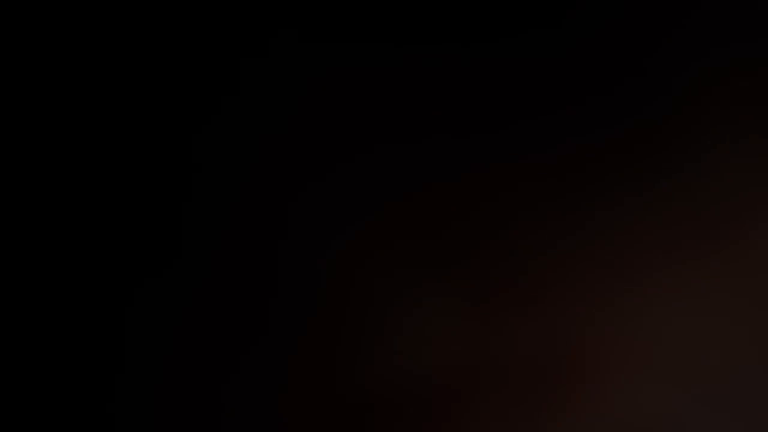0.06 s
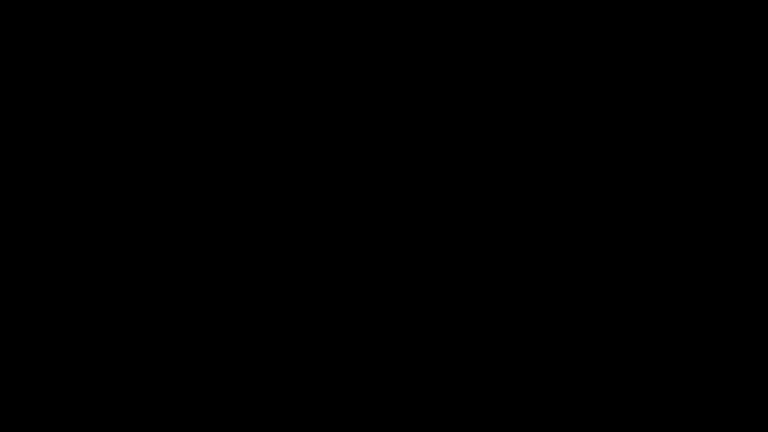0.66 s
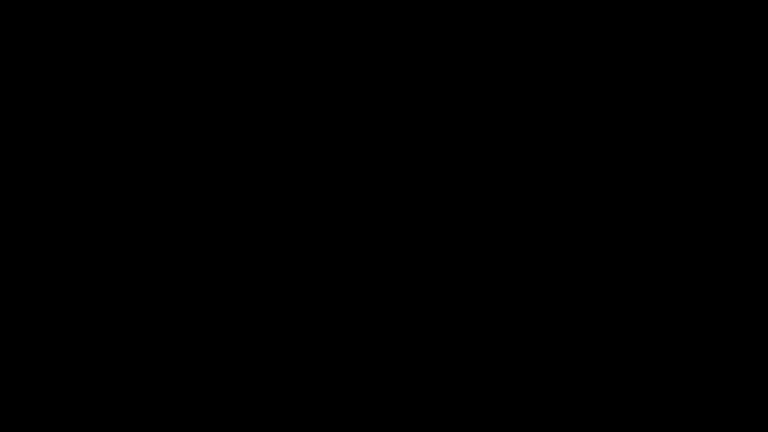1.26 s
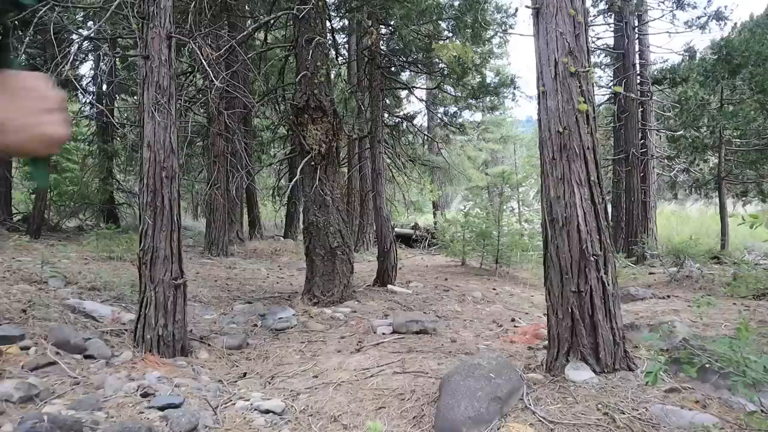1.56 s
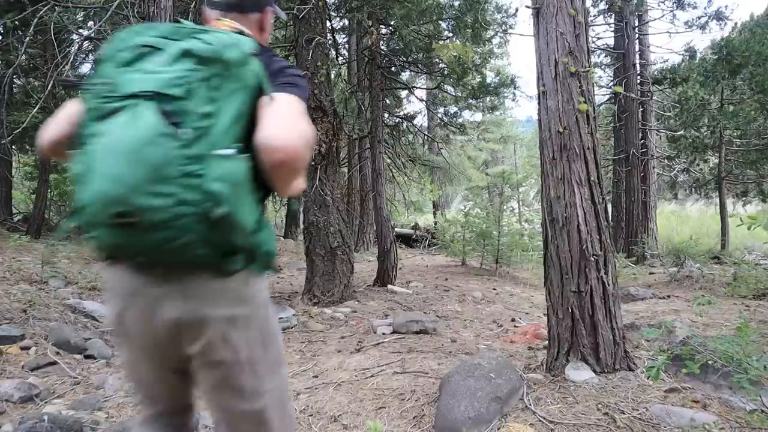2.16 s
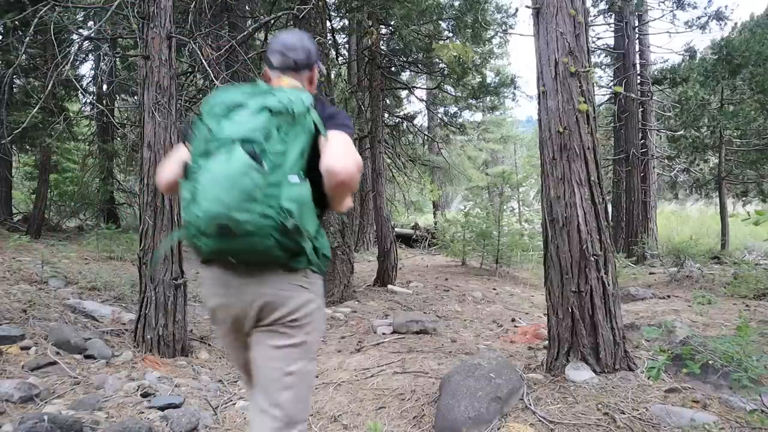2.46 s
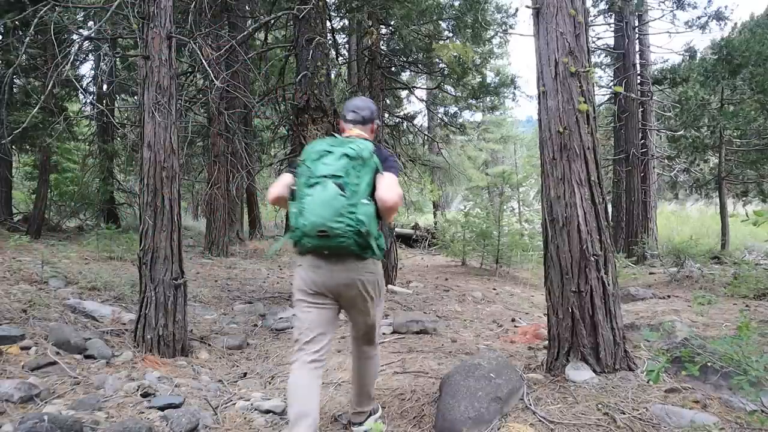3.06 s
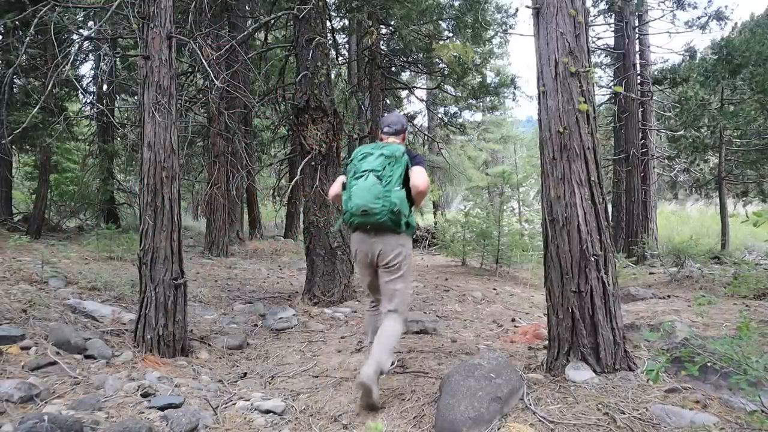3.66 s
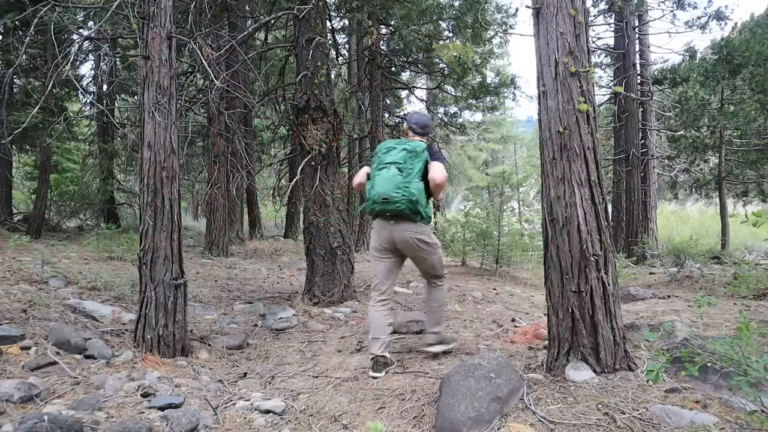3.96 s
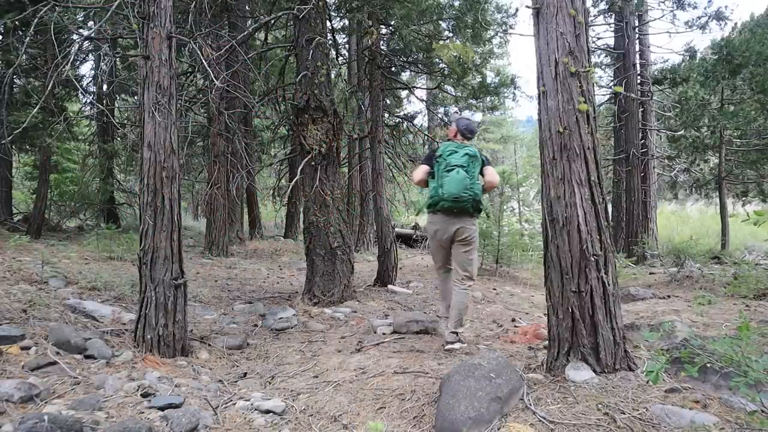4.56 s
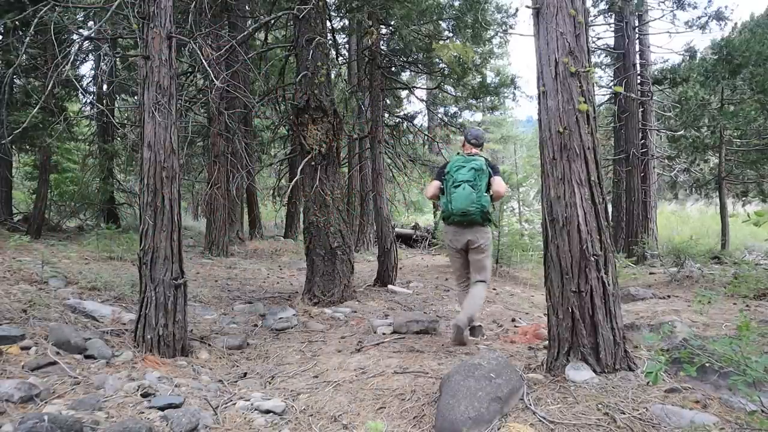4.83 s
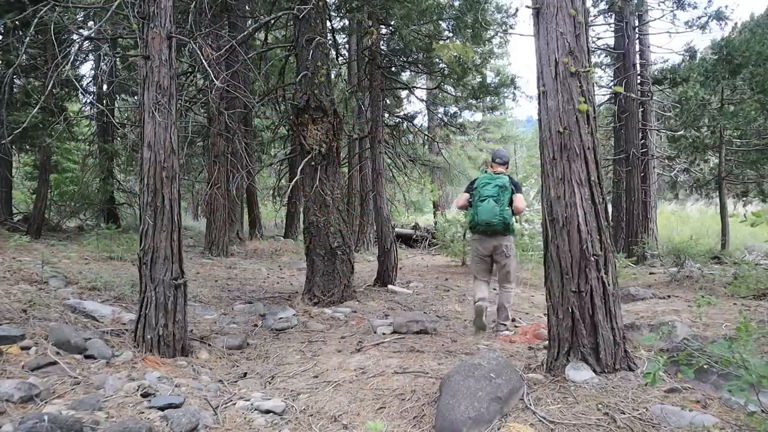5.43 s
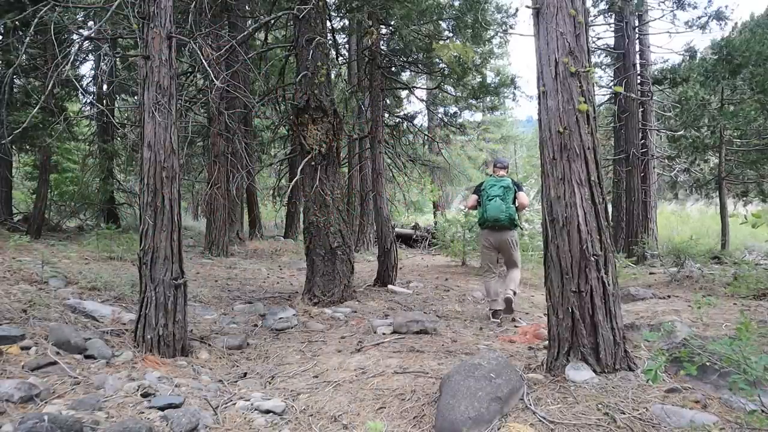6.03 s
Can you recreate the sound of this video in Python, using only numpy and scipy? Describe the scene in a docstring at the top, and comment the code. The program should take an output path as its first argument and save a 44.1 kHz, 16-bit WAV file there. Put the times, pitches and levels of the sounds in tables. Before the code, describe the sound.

A soft low bump and a steady forest rush are cut by half a second of silence. Then a hiker's footsteps pass close to the microphone, crunching dry pine needles, dirt and loose stones and snapping twigs, while a backpack rubs with a hollow tone. The steps recede into soft scuffs as a distant bird whistles a few short notes. Air rumbles lightly on the microphone.

```python
"""Footsteps of a hiker with a loaded pack pass close and recede over dry pine needles, dirt and stones.
Each step crushes soil, grit and needles in tiny fractures and snaps twigs; the pack rubs with a hollow
tone. A far bird whistles over the forest's rush of wind and water, and air rumbles on the microphone.
A soft bump opens the scene; the sound cuts out for half a second before the walk."""
import sys
import numpy as np
from scipy import signal
from scipy.fft import rfft, irfft, next_fast_len
from scipy.io import wavfile
from scipy.ndimage import uniform_filter1d, map_coordinates

SR = 44100
rng = np.random.default_rng(int(sys.argv[2]) if len(sys.argv) > 2 else 0)


def log_audio(samples):
    """Write samples as a 16-bit WAV file to the path given in sys.argv[1]."""
    # one column per channel
    frames = np.atleast_2d(samples).T
    # limit to full scale, then quantise
    limited = np.clip(frames, -1, 1)
    pcm = np.round(limited * 32767).astype(np.int16)
    wavfile.write(sys.argv[1], SR, pcm)


N = 277477
TIME = np.arange(N) / SR
MUTE_FROM_S, MUTE_TO_S = 1.016, 1.514

# Fracture spectra: f/Hz, gain/dB
SOIL_SPECTRUM = [(120, -58.5), (300, -3), (430, -1.5), (650, -1.5), (1150, -0.5), (1600, -9), (2600, -43.5),
                 (6000, -58)]
GRIT_SPECTRUM = [(700, -42), (1400, -14.5), (1900, -2), (3200, -1), (4600, -6), (6500, -11.5), (9000, -36),
                 (15000, -54)]
NEEDLE_SPECTRUM = [(3000, -7.5), (6000, -14.5), (8000, -5), (11000, -3.5), (16000, -10.5)]
# Loose stones in the ground: t/s, stoniness/0-1
STONINESS = [(1.9, 0.14), (2.04, 0.7), (2.56, 1), (2.6, 0.6), (2.66, 0), (2.95, 0.7), (3.12, 0.04),
             (3.6, 0)]


def steps(soil_db, grit_db, needle_db):
    """The sole crushes soil, grit and needles, which give way together in little clumps."""
    stony = np.clip(curves(STONINESS)[0], 0, 1)
    give = nearness() * wobble(170)
    soil = grains(SOIL_SPECTRUM, per_s=700, spread_db=2, clumps=amp(3.6 * give), dust_db=-8)
    grit = grains(GRIT_SPECTRUM, per_s=1300, spread_db=5.5, clumps=amp(2 * give), dust_db=-6)
    needles = grains(NEEDLE_SPECTRUM, per_s=2500, spread_db=2.5, clumps=amp(2.5 * give), dust_db=-11.5)
    stones = pebbles(hz=2970, scatter=.54, spread_db=15, swell_cycles=.23, count=2000)
    chips = pebbles(hz=7700, scatter=.2, spread_db=5, swell_cycles=1, count=2300)
    # stony ground: pitched clicks displace the dry crackle
    coarse = np.sqrt(1 - stony / 2) * grit + np.sqrt(stony / 2) * stones
    fine = np.sqrt(1 - stony) * needles + amp(1) * np.sqrt(stony) * chips
    # capped: single breaks stand out only under a light foot
    singles = amp(np.minimum(needle_db, -54) - 1) * nearness() * crackle(per_s=55, spread_db=5)
    return amp(soil_db - 3) * soil + amp(grit_db - 2.55) * coarse + amp(needle_db + 1.9) * fine + singles


# Shoe lands: t/s, hold/s, soil drive/dB, grit drive/dB, needle drive/dB, settling re crush/dB
FOOT_LANDINGS = [(1.51, .02, -47, -62, -73.5, -10), (2.049, 0.055, -28.5, -34, -52, -5.5),
                 (2.597, .07, -26, -30, -43.5, -16.5), (3.108, 0.086, -34, -37, -53, -11),
                 (3.594, 0.041, -41.5, -46.5, -61.5, -3), (3.708, 0.022, -43, -45.5, -61.5, -19.5),
                 (4.163, 0.059, -44, -47.5, -64.5, -6.5), (4.838, 0.059, -40, -48, -65, -2.5),
                 (5.4, 0.041, -38, -44.5, -55.5, -12.5), (5.826, .025, -47, -39.5, -52, -9.5),
                 (5.875, 0.034, -37, -42.5, -59, -22.5)]
# Sole rolls and pushes off: t/s, half length/s, soil drive/dB, needle drive/dB
SOLE_SCUFFS = [(1.913, 0.11, -52, -70), (2.163, 0.023, -37, -45.5), (2.274, 0.085, -42.5, -59),
               (2.463, 0.046, -42.5, -51.5), (2.524, 0.031, -33, -51), (3.06, 0.084, -42, -58),
               (4.278, 0.025, -51, -60.5), (4.457, 0.16, -54, -62.5), (4.948, 0.02, -53.5, -65.5),
               (5.513, 0.054, -49, -59.5)]


def tread():
    """Drive in dB on soil, grit and needles: footfalls crush and settle, scuffs swell and fade."""
    power = np.full((3, N), 1e-12)
    for s, hold_s, soil_db, grit_db, needle_db, settle_db in FOOT_LANDINGS:
        crush = swell(s, hold_s, rise_s=.028, fall_s=.026)
        settle = amp(settle_db) * swell(s, hold_s, rise_s=.028, fall_s=.45)
        power += np.outer(amp([soil_db, grit_db, needle_db]), np.maximum(crush, settle)) ** 2
    for s, half_s, soil_db, needle_db in SOLE_SCUFFS:
        grit_db = soil_db - 2.5
        power += np.outer(amp([soil_db, grit_db, needle_db]) ** 2, bell(s, half_s))
    return 10 * np.log10(power)


def nearness():
    """Falls from 1 to a half as the hiker walks off: far steps blur into a smoother scuff."""
    return np.interp(TIME, [3.1, 4.2], [1, .5])


def fractures(per_s, spread_db, max_sigma):
    """Brittle breaks: random impulses of uneven size and either sign."""
    breaks = rng.random(N) < per_s / SR
    sizes = amp(spread_db * np.clip(rng.standard_normal(N), -max_sigma, max_sigma))
    return breaks * sizes * rng.choice([-1, 1], N)


def grains(spectrum, per_s, spread_db, clumps, dust_db):
    """Tiny fractures on a bed of fine dust; rms 1."""
    breaks = unit(fractures(per_s, spread_db, max_sigma=2))
    dust = amp(dust_db) * rng.standard_normal(N)
    return steady(coloured((breaks + dust) * clumps, spectrum), samples=1500)


def pebbles(hz, scatter, spread_db, swell_cycles, count):
    """Small stones click together, each at its own pitch; rms 1."""
    when, phase = rng.random((count, 2)).T[..., None]
    pitch, size = np.clip(rng.standard_normal((count, 2)), -2, 2).T[..., None]
    k = np.arange(SR // 200)
    clicks = amp(spread_db * size) * ping(k / SR, hz * np.exp(scatter * pitch), swell_cycles, phase)
    at = (when * N).astype(int) + k
    return steady(np.bincount(at.ravel(), clicks.ravel(), N)[:N], samples=2000)


def crackle(per_s, spread_db):
    """Single dry needles break clear of the rest; rms 1."""
    return unit(coloured(fractures(per_s, spread_db, max_sigma=1.5), NEEDLE_SPECTRUM))


# Loudest twig and pebble cracks: t/s, level/dB, f/Hz, tick re level/dB
LOUD_SNAPS = [(1.5955, -37.5, 2010, -0.5), (1.8077, -22, 1500, -19), (1.8667, -28, 1930, -2.5),
              (1.9402, -29, 2040, -6.5), (2.0018, -23, 3330, 0), (2.0908, -14.5, 1500, -4),
              (2.0952, -9, 3100, -13.5), (2.1257, -15, 880, -13), (2.138, -19, 4520, -1),
              (2.242, -16, 1210, -32.5), (2.265, -16, 1420, -23), (2.2973, -14.5, 3820, -11),
              (2.301, -9.5, 2060, -17.5), (2.3792, -23, 1270, -17.5), (2.4338, -25.5, 3170, -8.5),
              (2.442, -19, 1400, -25), (2.557, -18.5, 2880, -1), (2.58, -15, 1870, -27),
              (2.6003, -7, 1100, -13), (2.9572, -21.5, 1490, -6.5), (3.0814, -24.5, 3800, -12.5),
              (3.1028, -21, 1550, -13), (3.121, -25.5, 5120, 11), (3.3655, -27, 2850, -17.5),
              (3.7966, -17, 2380, -8.5), (4.0805, -26.5, 2120, -2.5), (4.2002, -38.5, 3400, 9),
              (4.4576, -31, 4500, 5), (5.1878, -28, 3150, -11.5)]


def snaps(rows):
    """A twig breaks in damped swings with a tick, knocks the ground, scatters crumbs and splinters."""
    out, t = np.zeros(N + SR), np.arange(SR // 30) / SR
    for s, db, hz, tick_db in rows:
        phase, detune = rng.random(4), np.exp(.076 * rng.standard_normal(3))
        stony = np.interp(s, *np.transpose(STONINESS))
        tick_hz = np.interp(stony, [0, .8], [12500, 8200])  # thin needles tick highest
        swing = .8 * ping(t, hz, .45, phase[0]) + .12 * ping(t, 2.1 * hz * detune[0], .8, phase[1])
        splinters = amp(-11.5) * spray(t, tick_hz, ratio=1.47, t60_s=.014)
        tick = amp(tick_db) * (.6 * ping(t, tick_hz * detune[1], .9, phase[2]) + splinters)
        knock = amp(-12.5) * ping(t, 900 * detune[2], .58, phase[3])
        crumbs = amp(-8) * spray(t, hz, ratio=1.81, t60_s=.02)
        start = round(s * SR) - SR // 5000
        out[start:start + len(t)] += amp(db) * (swing + tick + knock + crumbs)
    return out[:N]


def small_twigs(grit_db, per_s=30, threshold_db=-56.5):
    """Random rows for snaps(): twigs break above a threshold, louder under a near, heavy foot."""
    when, size, pitch, tick = rng.random((int(per_s * N / SR), 4)).T
    at = (when * N).astype(int)
    load_db = np.minimum(grit_db[at] + 48.5, 10)
    level_db = -32 + .36 * load_db + 20 * np.log10(nearness()[at]) + 4 * (2 * size - 1)
    hz = 2610 * 2 ** (2 * pitch - 1)
    tick_db = -14 + 6 * (2 * tick - 1)
    rows = np.transpose([TIME[at], level_db, hz, tick_db])
    return rows[grit_db[at] > threshold_db]


# Pack shifts on the back: t/s, level/dB, hollow f/Hz
PACK_SHIFTS = [(1.53, -44.5, 235), (1.708, -36.5, 275), (1.858, -42.5, 250), (2.099, -38.5, 232),
               (2.23, -35.5, 255), (2.49, -33.5, 230), (2.56, -27.5, 240), (2.799, -53, 230),
               (3.058, -36.5, 220), (3.17, -30.5, 207), (3.448, -33, 226), (3.74, -49, 225),
               (4.14, -43.5, 240), (4.38, -49, 260), (4.68, -50.5, 250)]
# Rub spectrum: f/Hz, gain/dB
RUB_SPECTRUM = [(50, -22), (100, -16.5), (150, 0.5), (200, -5.5), (280, -4), (325, -5.5), (420, -6),
                (560, -19), (1500, -69)]


def pack():
    """The pack shifts with the stride: a broad rub with a hollow resonance that moves as it flexes."""
    power = sum((amp(db) * swell(s, hold_s=0, rise_s=.21, fall_s=.42)) ** 2 for s, db, _ in PACK_SHIFTS)
    phase = 2 * np.pi * np.cumsum(curves(PACK_SHIFTS)[1]) / SR
    hollow = unit(wobble(85) * np.cos(phase) + wobble(85) * np.sin(phase))
    rub = amp(.5) * rush(RUB_SPECTRUM, patchy_db=6)
    return np.sqrt(power) * steady(hollow + rub, samples=2400)


# Bird notes: t/s, length/s, turn position/0-1, start f/Hz, turn f/Hz, end f/Hz, level/dB
BIRD_NOTES = [(2.72, .1, .6, 2550, 2400, 2480, -48), (3.21, .11, .4, 2350, 2530, 2100, -53),
              (3.36, .13, .5, 2020, 2150, 2130, -51.5), (3.40, .05, .55, 3600, 4000, 3850, -52),
              (3.872, .075, .35, 2900, 3460, 2950, -42.5), (3.86, .11, .35, 2650, 3000, 2600, -50),
              (3.97, .075, .6, 2850, 3470, 3330, -50), (3.99, .065, .1, 2800, 2700, 2000, -50),
              (4.638, .033, .5, 3400, 3430, 3380, -50), (4.668, .042, .9, 2550, 3130, 3100, -49),
              (4.702, .125, .38, 3180, 2690, 2820, -43.5)]


def bird():
    """Slurred, fluttering whistles: each bends through one turn and swells towards it."""
    song = np.zeros(N)
    waver = 1 + .014 * wobble(260)
    for s, length_s, turn, start_hz, turn_hz, end_hz, db in BIRD_NOTES:
        on = (TIME > s) & (TIME < s + length_s)
        from_turn = np.interp((TIME[on] - s) / length_s, [0, turn, 1], [-1, 0, 1])
        hz = turn_hz + (np.where(from_turn < 0, start_hz, end_hz) - turn_hz) * from_turn ** 2
        envelope = amp(db) * (1 - from_turn ** 2) ** .51
        song[on] += envelope * np.sin(2 * np.pi * np.cumsum(hz * waver[on]) / SR)
    flutter = amp(1.3 * wobble(110))
    return song * flutter


def bump(at_s=.055, half_s=.016, hz=48):
    """A finger nudges the camera: one soft, low push."""
    return amp(-31) * bell(at_s, half_s) * np.sin(2 * np.pi * hz * (TIME - at_s))


# Spectra of the forest and of air on the microphone, before and during the walk: f/Hz, gain/dB
FOREST_REST_SPECTRUM = [(100, -9), (190, -5), (380, -8), (670, -2.5), (800, -3.5), (1240, 0), (1600, -5.5),
                        (3200, -11.5), (6300, -27), (9000, -31.5), (15800, -34.5)]
FOREST_WALK_SPECTRUM = [(30, -16), (60, -3), (130, 2), (380, 3), (650, -0.5), (1200, 1.7), (1600, -5),
                        (3200, -9.5), (4500, -19.5), (7000, -27.5), (15800, -30.5)]
AIR_REST_SPECTRUM = [(12, -12), (25, -2), (45, 0), (70, -3), (110, -7), (150, -18), (300, -45)]
AIR_WALK_SPECTRUM = [(10, -32), (22, -7.5), (40, -5), (80, -2), (120, 1.5), (200, -24.5), (500, -75)]
# Air in the hiker's wake: t/s, relative level/dB
WAKE_LEVELS = [(1.62, -57), (1.68, -50), (1.76, -49.5), (2.31, -46), (3.43, -50), (3.91, -56), (4.9, -53.5),
               (5.25, -60), (6.27, -64.5)]


def forest(fade_db_per_s=.55):
    """Distant wind and water rush; the passing hiker shields the microphone, and air rumbles on it."""
    rest_rush = amp(-43) * rush(FOREST_REST_SPECTRUM, patchy_db=1)
    rest_air = amp(-52) * rush(AIR_REST_SPECTRUM, patchy_db=-1.1)
    shield_db = 12.5 * bell(1.656, half_s=.23)
    walk_db = -42.5 - fade_db_per_s * (TIME - MUTE_TO_S) - shield_db
    walk_rush = amp(walk_db) * rush(FOREST_WALK_SPECTRUM, patchy_db=1.5)
    wake = amp(2.5 + curves(WAKE_LEVELS)[0]) * rush(AIR_WALK_SPECTRUM, patchy_db=1.5)
    return np.where(TIME < MUTE_FROM_S, rest_rush + rest_air, walk_rush + wake)


# Echo among the trunks: f/Hz, t60/s
ECHO_DECAY = [(200, .35), (2500, 0.98), (12000, 0.26)]


def woods(x):
    """Trunks scatter a diffuse echo that lasts longest in the midrange."""
    hz, t, noise = signal.stft(rng.standard_normal(SR // 2), SR, nperseg=256)
    decay = amp(-60 * t / along(ECHO_DECAY, hz)[:, None])
    tail = signal.istft(noise * decay, SR, nperseg=256)[1]
    return signal.fftconvolve(x, tail / np.linalg.norm(tail))[:N]


def ping(t, hz, swell_cycles, phase):
    """Heavily damped ring; its envelope peaks at 1 after swell_cycles."""
    u = t * hz / swell_cycles
    return u * np.exp(1 - u) * np.sin(2 * np.pi * (hz * t + phase))


def spray(t, hz, ratio, t60_s):
    """Dying noise burst from hz / ratio to hz * ratio."""
    band = signal.butter(2, np.clip([hz / ratio, hz * ratio], 100, 20000), "band", fs=SR)
    return signal.lfilter(*band, rng.standard_normal(len(t))) * amp(-60 * t / t60_s)


def rush(spectrum, patchy_db):
    """Noise with drifting patches of gain; rms 1."""
    bins = signal.stft(rng.standard_normal(N), nperseg=512)[2]
    patches = uniform_filter1d(rng.standard_normal(bins.shape), size=6, axis=0)
    patches = unit(uniform_filter1d(patches, size=14, axis=1))
    noise = signal.istft(bins * amp(patchy_db * patches), nperseg=512)[1][:N]
    return unit(coloured(noise, spectrum))


def coloured(x, spectrum):
    """Minimum-phase filter: attacks stay sharp."""
    m = 2 * next_fast_len(N // 2 + SR // 4)
    gain = amp(along(spectrum, np.fft.rfftfreq(m, 1 / SR)))
    cepstrum = irfft(np.log(gain), m)
    cepstrum[1:m // 2] *= 2
    cepstrum[m // 2 + 1:] = 0
    return irfft(rfft(x, m) * np.exp(rfft(cepstrum)), m)[:N]


def swell(s, hold_s, rise_s, fall_s):
    """Attack, hold, release; peak 1, rise and fall times per 20 dB."""
    return amp(-20 * (np.maximum(s - TIME, 0) / rise_s + np.maximum(TIME - s - hold_s, 0) / fall_s))


def bell(s, half_s):
    """Gaussian hump at s; peak 1."""
    return np.exp(-((TIME - s) / half_s) ** 2)


def wobble(knots_per_s):
    """Smooth random curve."""
    return map_coordinates(rng.standard_normal(N // 8), [TIME * knots_per_s], mode="wrap")


def curves(rows):
    """Per-sample curve for each column after the time."""
    s, *columns = np.transpose(rows)
    return [np.interp(TIME, s, column) for column in columns]


def along(points, hz):
    """(f/Hz, value) points read on a log axis."""
    f, values = np.transpose(points)
    return np.interp(np.log(hz + 1), np.log(f + 1), values)


def steady(x, samples):
    """Scale to running rms 1."""
    return x / np.sqrt(np.abs(uniform_filter1d(x * x, size=samples)) + 1e-12)


def unit(x):
    """Scale to rms 1."""
    return x / np.sqrt(np.mean(x ** 2) + 1e-20)


def amp(db):
    """dB to gain."""
    return 10 ** (np.asarray(db) / 20)


def scene():
    """Near hiker, almost dry; far bird with an echo; forest behind. Mono."""
    soil_db, grit_db, needle_db = tread()
    feet = steps(soil_db, grit_db, needle_db) + snaps(LOUD_SNAPS)
    song = bird()
    far_bird = song + amp(-9) * woods(song)
    hiker = feet + amp(-29.5) * woods(feet) + pack()
    background = far_bird + bump() + forest()
    twigs = snaps(small_twigs(grit_db))
    return (hiker + twigs + background)[None]


def record(dry, top_hz=15950):
    """Half-second mute, then a brick-wall low-pass."""
    live = (TIME < MUTE_FROM_S) | (TIME > MUTE_TO_S)
    m = next_fast_len(N + SR // 4)
    passband = np.fft.rfftfreq(m, 1 / SR) < top_hz
    return irfft(rfft(dry * live, m) * passband, m)[..., :N]


dry = scene()
out = record(dry)
log_audio(out)
```